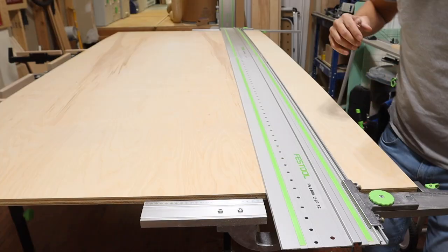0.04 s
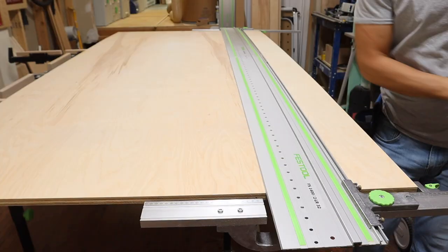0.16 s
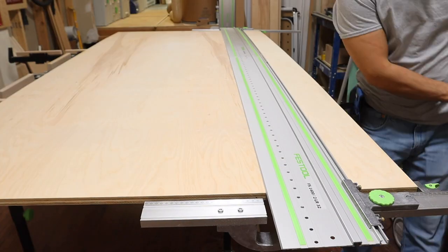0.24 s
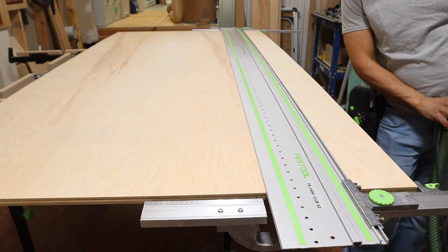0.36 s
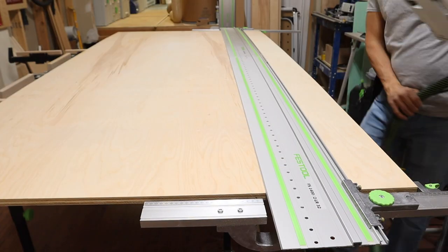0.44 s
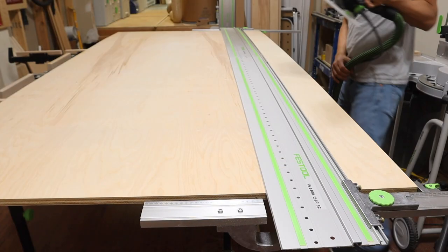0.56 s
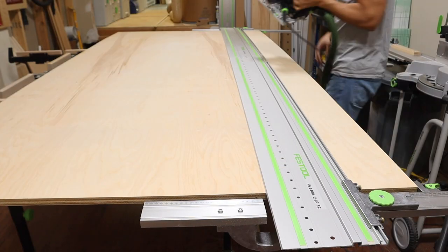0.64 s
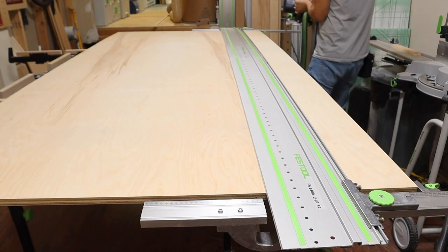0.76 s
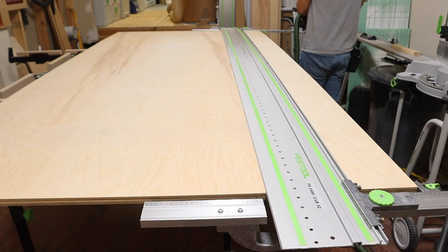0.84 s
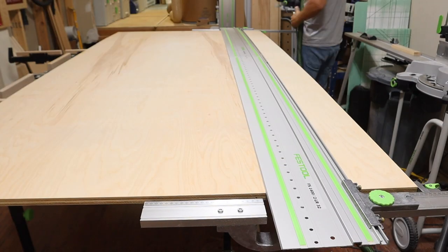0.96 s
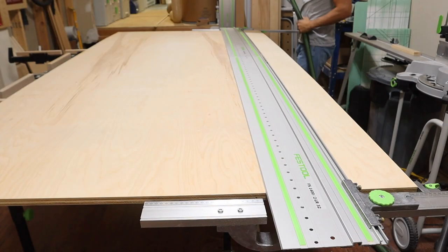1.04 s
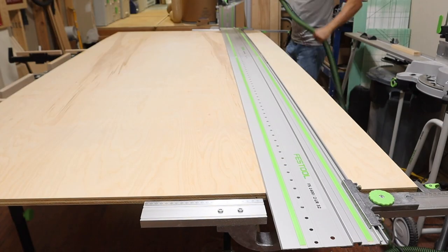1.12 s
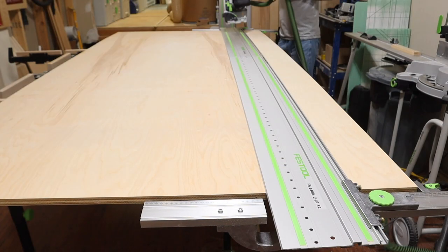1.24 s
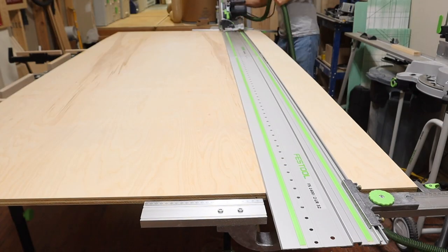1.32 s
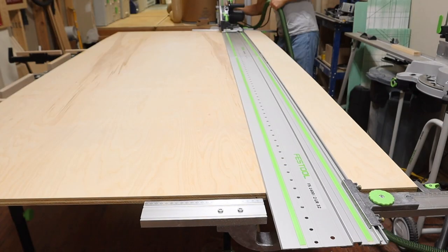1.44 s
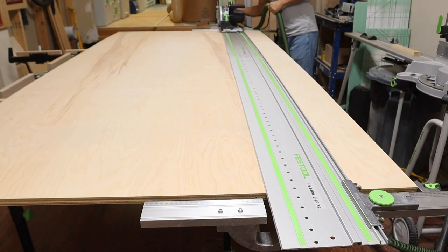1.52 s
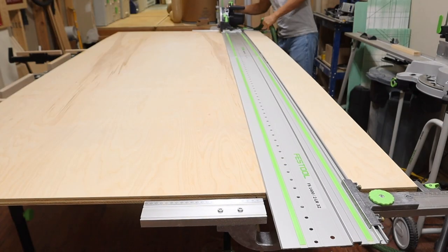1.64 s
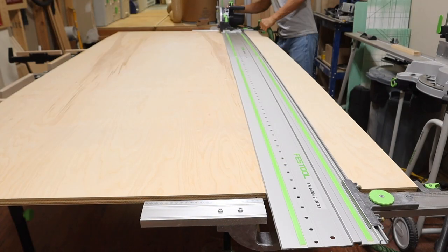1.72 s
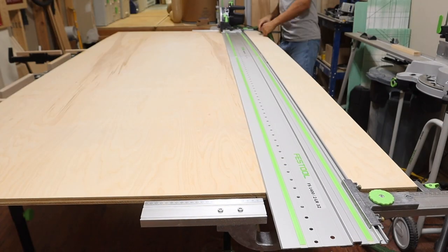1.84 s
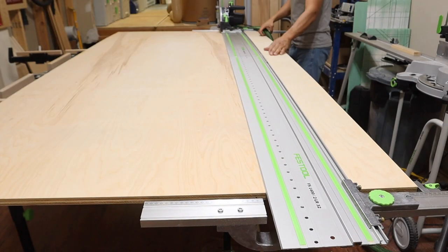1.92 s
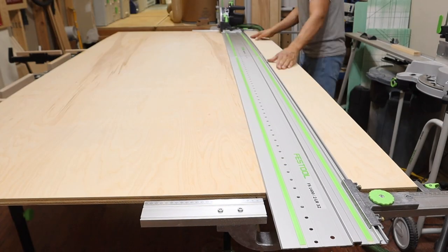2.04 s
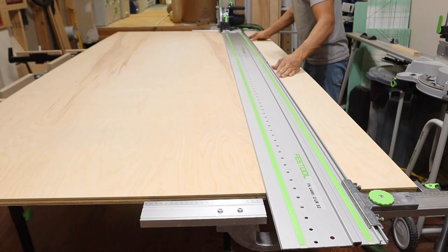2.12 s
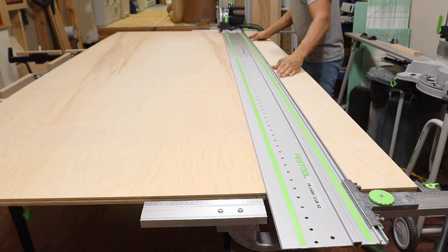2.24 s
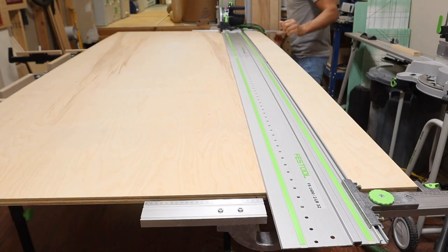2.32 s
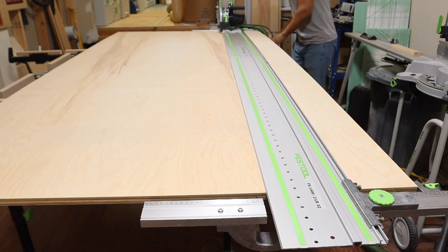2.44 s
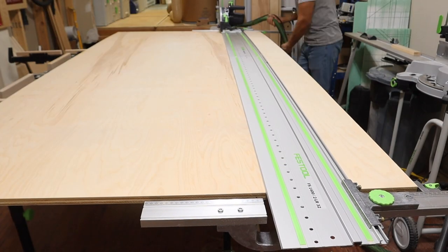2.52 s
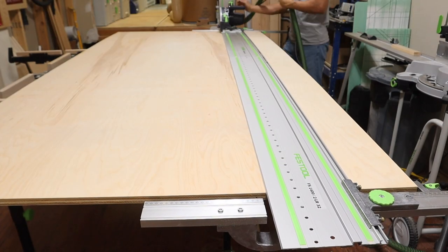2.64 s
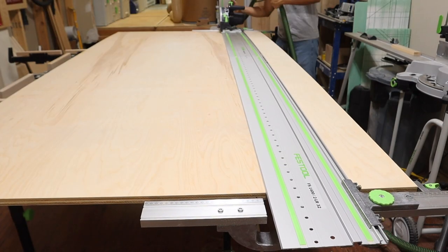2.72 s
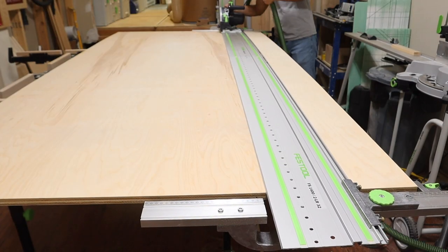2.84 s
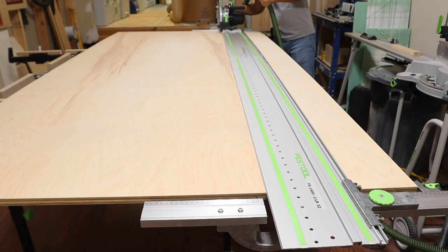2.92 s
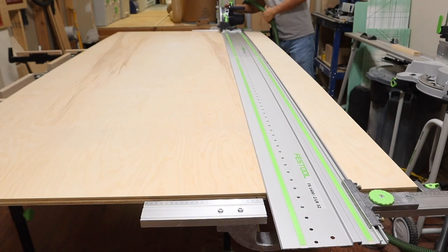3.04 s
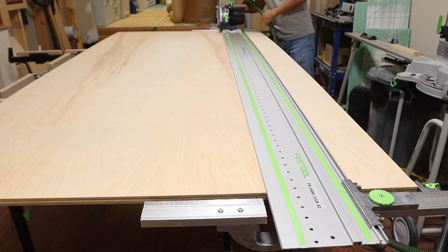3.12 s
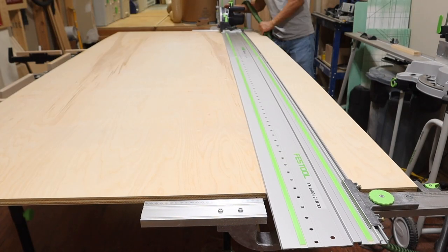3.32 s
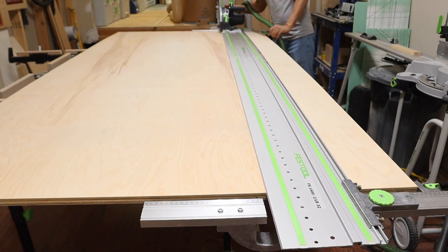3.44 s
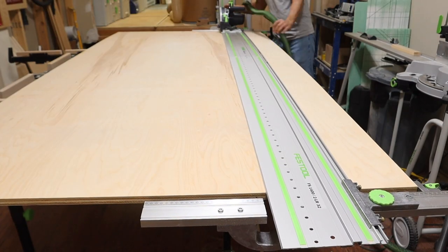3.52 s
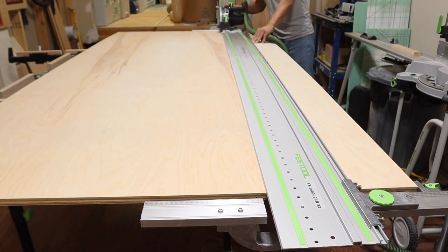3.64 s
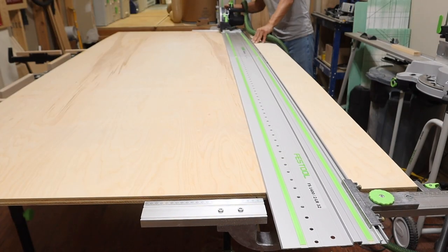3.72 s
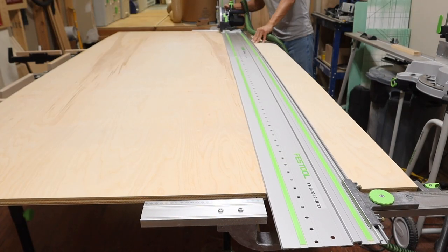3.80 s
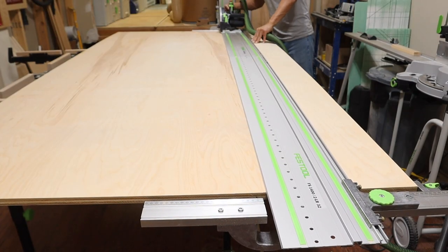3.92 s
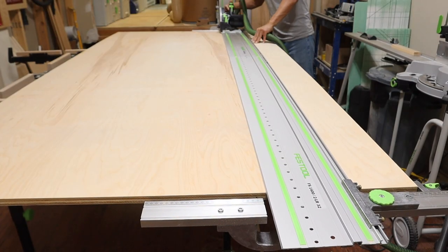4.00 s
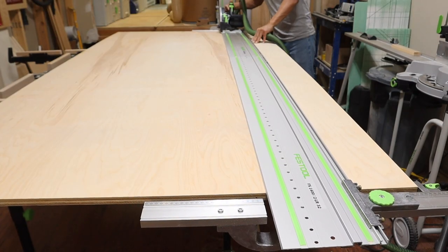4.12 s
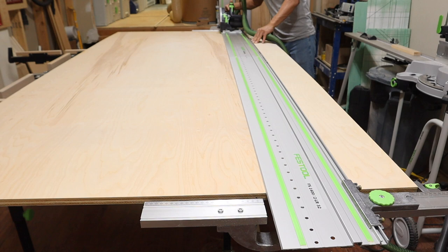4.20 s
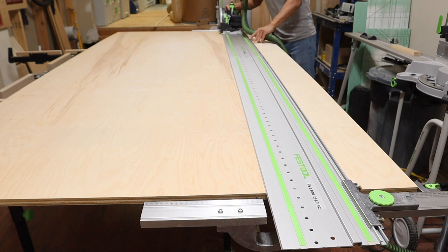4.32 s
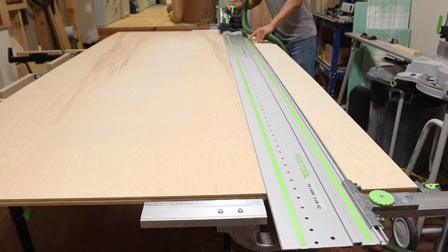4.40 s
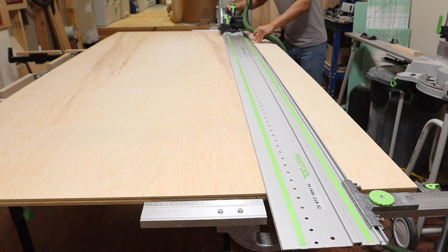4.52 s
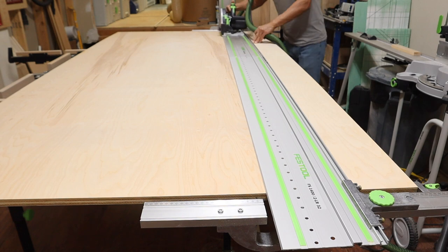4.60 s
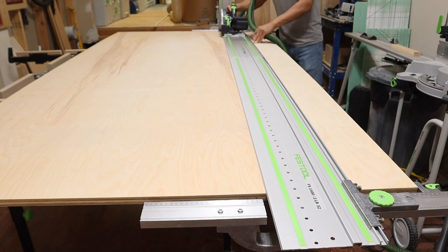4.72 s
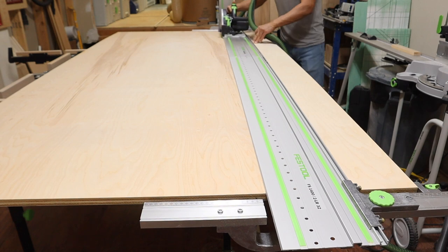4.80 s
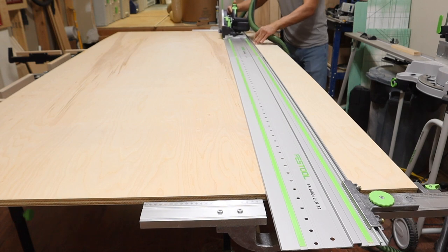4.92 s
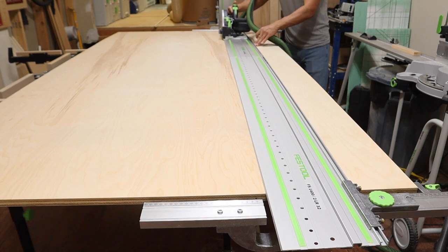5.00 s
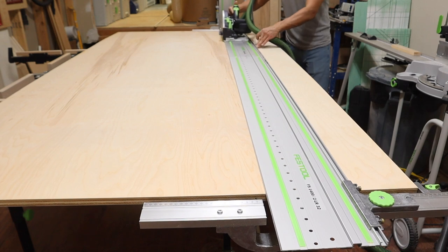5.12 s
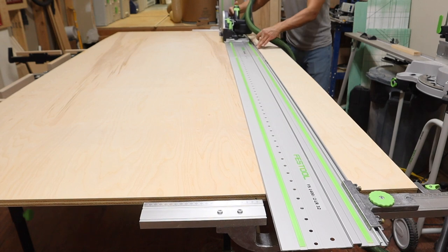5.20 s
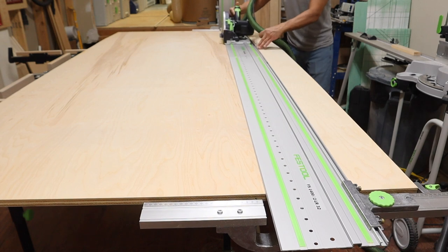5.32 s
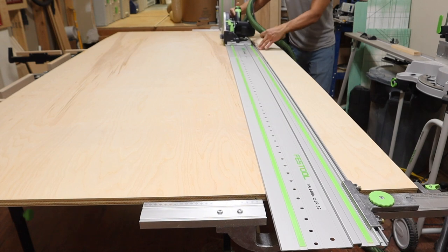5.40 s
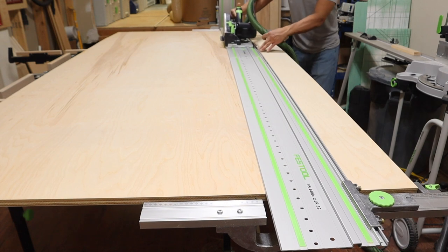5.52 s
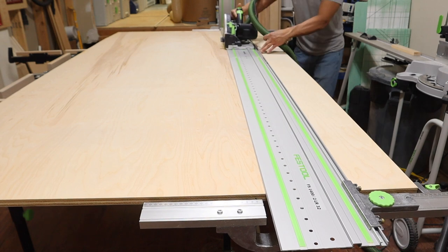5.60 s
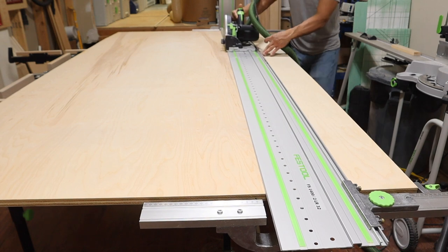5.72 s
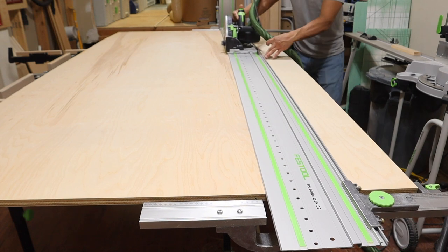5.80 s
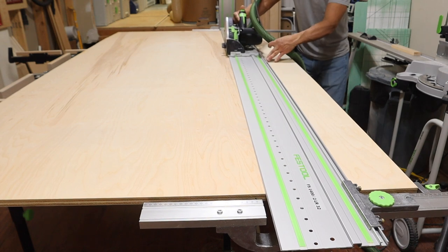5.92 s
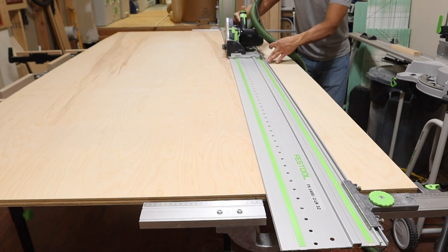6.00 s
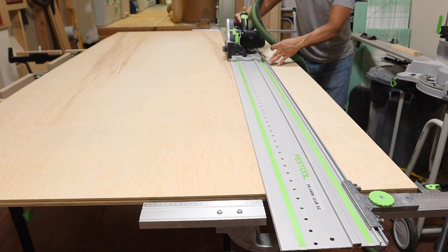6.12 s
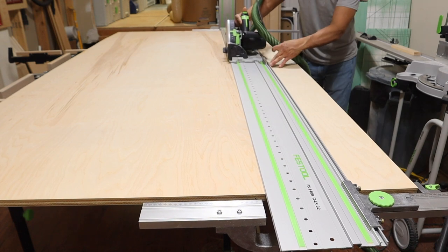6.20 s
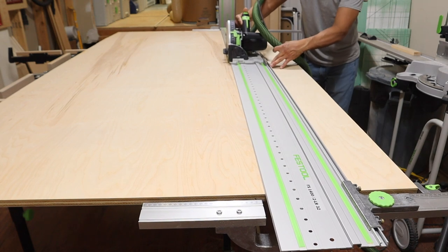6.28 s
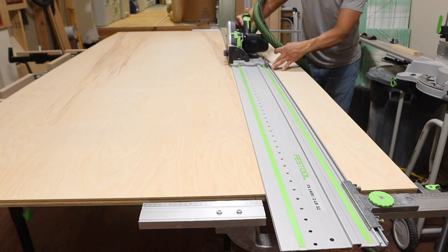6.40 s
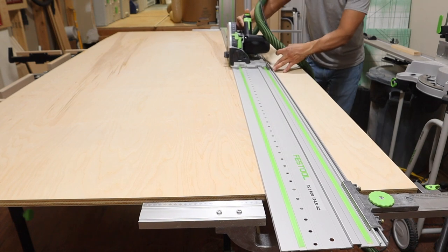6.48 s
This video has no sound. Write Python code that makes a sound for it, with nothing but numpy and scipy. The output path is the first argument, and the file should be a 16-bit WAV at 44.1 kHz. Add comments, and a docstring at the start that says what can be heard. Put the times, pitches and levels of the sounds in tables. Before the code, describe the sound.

A small workshop with faint tonal hum and soft hiss, heard centred with a short dry room tail. From 0 to 1.2 s a ribbed hose rustles and a saw base makes light taps and scrapes, with a sharper knock at 0.3 s. At 1.2 s comes a tiny high squeak, then clicks from 1.35 s and the loudest clunk at 1.65 s as the saw seats on the rail. Scuffs and a knock follow around 2.0 s, then sparse small taps at 2.45, 2.7 and 3.05 s. At 3.13 s the motor jolts on with a bright, harsh burst, its whine racing upward until 3.4 s. Blade rasp, gear and fan whines and rushing air fill 3.2-4.5 s, with slight dips near 4.0 and 4.2 s and faint low puffs. It then runs steadier, its shrill tones wavering, until rasping load returns at 6.27 s and continues nearly to the 6.5 s end.

```python
"""Plunge saw on a guide rail

A plunge track saw is set on its rail on a plywood sheet in a small, humming workshop.
The hose rustles and the base squeaks, knocks and scuffs: shaped noise and a gliding whistle.
Then the motor bursts into life: harmonic whines of fan, gears and drone follow pitch curves,
while noise through resonances gives the rushing air and the blade as it is pushed into the sheet.
"""
import sys
import numpy as np
from scipy import signal
from scipy.fft import rfft, irfft
from scipy.io import wavfile

SR = 44100
rng = np.random.default_rng(int(sys.argv[2]) if len(sys.argv) > 2 else 0)


def materialize(psi):
    """Save the field psi as 16-bit PCM at rate SR to the path in sys.argv[1].

    A 1-D psi becomes a single channel; in a 2-D psi each row is a channel.
    """
    bounded = np.clip(np.atleast_2d(psi).T, -1, 1)
    quanta = np.round(bounded * 32767).astype(np.int16)
    wavfile.write(sys.argv[1], SR, quanta)


N = 288855
TIME = np.arange(N) / SR
START_S = 3.128  # the motor is switched on


def from_db(db):
    """Logarithmic level: decibels to amplitude gain."""
    return 10 ** (np.asarray(db) / 20)


def rms_one(x):
    """Normalisation: scale to unit mean power."""
    return x / np.sqrt(np.mean(x ** 2) + 1e-20)


def in_time(rows):
    """Linear interpolation: each column of a curve at every sample."""
    seconds, *columns = np.transpose(rows)
    return [np.interp(TIME, seconds, column) for column in columns]


def noise(spectrum, resonances=(), size=N):
    """Spectral shaping: white noise given a broad colour and narrow resonances; rms 1."""
    hz = np.fft.rfftfreq(size, 1 / SR) + 1e-3
    points = np.array(spectrum)
    db = np.interp(np.log(hz), np.log(points[:, 0]), points[:, 1])
    for centre, width, lift in resonances:
        db = db + lift / (1 + (2 * (hz - centre) / width) ** 2)
    white = rng.standard_normal(size)
    return rms_one(irfft(rfft(white) * from_db(db), size))


def drift(rate):
    """Low-passed chance: a random curve changing about rate times a second; spread 1."""
    step = 20  # samples between the points of the slow curve
    settle = 4000  # points dropped while the filter settles
    pole = np.exp(-2 * np.pi * step * rate / SR)
    white = rng.standard_normal(N // step + settle + 2)
    slow = signal.lfilter([1], [1, -2 * pole, pole * pole], white)[settle:]
    return np.interp(np.arange(N) / step, np.arange(len(slow)), rms_one(slow))


def tone(pitch, orders, jitter, flutter_db, flutter_rate=12):
    """Fourier series: harmonics of a slightly unsteady pitch, each fluttering in level."""
    phase = 2 * np.pi * np.cumsum(pitch * (1 + jitter * drift(35.0))) / SR
    total = 0
    for multiple, db in orders:
        gain = from_db(db + flutter_db * drift(flutter_rate))
        total = total + gain * np.sin(round(multiple) * phase + rng.uniform(0, 2 * np.pi))
    return np.sqrt(2) * total  # a sine of rms 1 peaks at sqrt(2)


def swell(start, end, rise_s, fall_s):
    """Exponential release: rise from start, hold until end, then die away; top 1."""
    rise = np.clip((TIME - start) / rise_s, 0, 1)
    return rise * np.exp(-np.clip((TIME - end) / fall_s, 0, 20))


SURGE_DB, SURGE_RISE_S = -26, 0.034


def surge(hold_s=0.073, fall_db_per_s=84):
    """Starting transient: the jolt builds fast, holds and dies as the blade gains speed; top 1."""
    age = TIME - START_S
    rise = np.clip(age / SURGE_RISE_S, 0, 1) ** 2
    return rise * from_db(-fall_db_per_s * np.maximum(age - hold_s, 0))


# Spells in which blade and gears are worked hard.
# Each row: start in seconds, end in seconds, level at the start in dB, easing in dB per second.
LOAD_SPELLS = [(3.2, 3.98, -36, 4), (4.03, 4.169, -35, 14), (4.202, 4.526, -35, 2), (6.27, 6.523, -36, 0.5)]


def effort(idle_db=-46.5, rise_s=.025, fall_s=.018):
    """Addition of powers: idling, the starting jolt and the spells of load make one gain."""
    idle = from_db(idle_db) * np.clip((TIME - START_S) / SURGE_RISE_S, 0, 1)
    parts = [idle, from_db(SURGE_DB) * surge()]
    for start, end, db, easing in LOAD_SPELLS:
        eased = from_db(db - easing * np.maximum(TIME - start, 0))
        parts.append(eased * swell(start, end, rise_s, fall_s))
    return np.linalg.norm(parts, axis=0)


# Broad colour of the cutting noise. Each row: frequency in Hz, relative density in dB per Hz.
RASP_COLOUR = [(180, -80), (300, -58), (372, -52), (590, -21.5), (620, -18), (1090, -14.5), (1280, -14),
               (1750, -14.5), (2140, -13.5), (4210, -6), (7500, 1), (8560, -5.5), (15500, -15.5)]
# Resonances of the blade. Each row: centre in Hz, width in Hz, lift in dB.
BLADE_MODES = [(664, 67, 6), (800, 50, 9.5), (1285, 97, 11.5), (1740, 180, -1), (2134, 130, 11),
               (3530, 170, 12), (4840, 44, 10), (5050, 23, 9.5), (5300, 30, 10), (5700, 33, 4),
               (5930, 34, 8), (6730, 40, 7.5), (6700, 42, -4), (7340, 62, 0), (7220, 35, 8),
               (7650, 60, 10.5), (7900, 53, 13)]


def blade(load, rasp_db=-1, chatter_db=0.74, grit_db=1.0):
    """Forced vibration: uneven tooth and gear contacts set the steel disc ringing."""
    roughness = chatter_db * drift(31) + grit_db * drift(430)
    return load * from_db(rasp_db + roughness) * noise(RASP_COLOUR, BLADE_MODES)


# Gear whine, sagging and surging. Each row: time in seconds, pitch in Hz.
GEAR_PITCH = [(3.3, 2120), (3.43, 2266), (3.82, 2245), (3.95, 2156), (4.04, 2202), (4.1, 2344),
              (4.27, 2225), (4.55, 2243), (4.88, 2252), (5.1, 2211), (5.33, 2260), (5.55, 2210),
              (5.8, 2255), (5.93, 2210), (6.1, 2284), (6.25, 2267), (6.55, 2264)]
# Harmonics of the gear whine. Each row: multiple of the pitch, level in dB before the slow fade.
GEAR_ORDERS = [(1, -52.5), (2, -53), (4, -52), (5, -54.5), (6, -65)]
# The rotor's own hum. Each row: time in seconds, level in dB.
ROTOR_LEVEL = [(3.3, -84), (4.15, -74.5), (5.1, -87), (6.1, -72.5), (6.55, -73)]


def gears(rise_s=0.049, fade_db_per_s=1.5, rotor_ratio=.2058):
    """Meshing frequency: gears and rotor share one speed; the whine enters and slowly recedes."""
    (pitch,), (rotor_db,) = in_time(GEAR_PITCH), in_time(ROTOR_LEVEL)
    age = TIME - GEAR_PITCH[0][0]
    whine = tone(pitch, GEAR_ORDERS, jitter=0.00092, flutter_db=2.0, flutter_rate=9.5)
    whine *= from_db(-fade_db_per_s * age)
    # rotor_ratio: rotor turns per cycle of the gear whine
    rotor = from_db(rotor_db) * tone(pitch * rotor_ratio, [(1, 0)], jitter=0.0015, flutter_db=1.2)
    return np.clip(age / rise_s, 0, 1) * (whine + rotor)


# Pitch of the fan whine. Each row: time in seconds, pitch in Hz.
FAN_PITCH = [(3.1, 1150), (3.3, 1579), (3.4, 1705), (3.5, 1732), (3.89, 1738), (4.03, 1703), (4.22, 1739),
             (4.33, 1722), (4.58, 1717), (5.2, 1716), (5.9, 1712), (6.55, 1719)]
# Lower harmonics of the fan. Each row: multiple of the pitch, level in dB at the final speed.
FAN_LOW_ORDERS = [(1, -50), (2, -48.5)]
# The piercing third harmonic. Each row: time in seconds, level in dB at the final speed.
FAN_SHRILL = [(3.33, -62), (3.48, -39.5), (3.82, -50), (3.93, -42.5), (4.35, -42), (4.62, -46), (5.12, -43),
              (5.55, -48.5), (6.15, -49), (6.42, -42.5)]


def fan(rise_s=.2, speed_power=4):
    """Aeroacoustic power law: whine grows steeply with speed; its third harmonic swells and fades."""
    (pitch,), (shrill_db,) = in_time(FAN_PITCH), in_time(FAN_SHRILL)
    whine = tone(pitch, FAN_LOW_ORDERS, jitter=0.00044, flutter_db=0.77, flutter_rate=7.8)
    shrill = tone(pitch, [(3, 0)], jitter=0.0004, flutter_db=0.85, flutter_rate=16)
    whine += from_db(shrill_db) * shrill
    speed_gain = (pitch / pitch[-1]) ** speed_power
    return np.clip((TIME - START_S) / rise_s, 0, 1) * speed_gain * whine


# Partials of the electric drone. Each row: multiple of the pitch, level in dB at the surge's
# nominal top before throbbing, exponent of the load, lag behind the load in seconds,
# throbs per second, throb depth in dB, time of one crest in seconds.
DRONE_PARTIALS = [(1, -51.5, 0.55, 0.0099, 1.494, 3.8, 4.383), (2, -47, 1.03, -0.011, 6.13, 3.5, 4.14),
                  (3, -62, .55, -0.0046, 1.7, 4, 4.45)]


def drone(load, pitch_hz=636):
    """Amplitude modulation: the electric drone throbs and swells with load, the octave most."""
    out = 0
    for multiple, db, exponent, lag, rate, depth_db, crest in DRONE_PARTIALS:
        strain = np.interp(TIME - lag, TIME, load) / from_db(SURGE_DB)
        throb_db = depth_db * np.cos(2 * np.pi * rate * (TIME - crest))
        partial = tone(pitch_hz, [(multiple, 0)], jitter=0.0014, flutter_db=1.6)
        out = out + strain ** exponent * from_db(db + throb_db) * partial
    return out


# Resonances of blade and housing that sing out for a while.
# Each row: start in seconds, end in seconds, centre in Hz, width in Hz, held level in dB rms.
SINGING_MODES = [(3.15, 3.28, 7430, 100, -38), (3.15, 3.29, 7630, 63, -40), (3.4, 3.92, 2078, 36, -51.5),
                 (4.17, 5.177, 1163, 58, -59.5), (4.35, 5.4, 3485, 25, -50.5), (5.35, 5.65, 8870, 120, -51)]


def rings(rise_s=.03, fall_s=.05):
    """Resonance: narrow bands, driven by the rough contact, build up, hold and die away."""
    out, white = 0, rng.standard_normal(N)
    for start, end, hz, width, db in SINGING_MODES:
        edges = [hz - width / 2, hz + width / 2]
        band = signal.butter(2, edges, "band", fs=SR, output="sos")
        ringing = rms_one(signal.sosfilt(band, white))
        out = out + from_db(db) * ringing * swell(start, end, rise_s, fall_s)
    return out


# Strength of the rushing air. Each row: time in seconds, level in dB.
AIR_LEVEL = [(3.3, -33), (3.6, -35.5), (4.1, -34.5), (4.6, -36.5), (5.2, -34.5), (6.55, -35)]
# Broad colour of the air. Each row: frequency in Hz, relative density in dB per Hz.
AIR_COLOUR = [(25, -38), (60, -34), (130, -34.5), (300, -30.5), (540, -25.5), (700, -19.5), (950, -18.5),
              (1200, -15.5), (1600, -10), (1950, -10.5), (3400, -2), (5200, -3), (9000, -5), (15500, -3.5)]
# Resonances of the housing. Each row: centre in Hz, width in Hz, lift in dB.
HOUSING_MODES = [(696, 67, 9), (974, 480, -8.5), (1167, 120, 10), (1550, 330, -5), (1847, 69, 4.5),
                 (2270, 74, 7.5), (2320, 64, -5.5), (2410, 65, -0.5), (2760, 150, -1.5), (2900, 63, 4),
                 (3470, 86, 0), (4840, 160, -0.5), (5450, 930, -4.5), (6380, 88, 6.5), (6850, 60, 3.5),
                 (7950, 170, 0.5), (8730, 1200, 4), (10380, 170, 5), (12400, 90, 1)]


def air(rise_s=0.16, gust_db=0.5):
    """Turbulence: cooling and extraction air builds up and rushes through the resonant housing."""
    db, = in_time(AIR_LEVEL)
    flow = np.clip((TIME - START_S) / rise_s, 0, 1) * from_db(db + gust_db * drift(21))
    return flow * noise(AIR_COLOUR, HOUSING_MODES)


def reflections(x, count=8, strength=.18):
    """Comb filtering: echoes off sheet and walls, their paths creeping as the saw advances."""
    out = x.copy()
    # delay in seconds, creep in seconds of delay per second
    for delay, creep in rng.uniform([.001, -8e-5], [.014, 8e-5], (count, 2)):
        out += strength * np.interp(TIME - delay - creep * TIME, TIME, x)
    return out


# Puffs of air on the microphone. Each row: centre in seconds, level in dB, length (sigma) in seconds.
AIR_PUFFS = [(3.625, -52.5, .02), (3.681, -50, 0.0074), (3.715, -52, 0.017), (3.772, -59, 0.015),
             (3.818, -52, 0.013), (3.986, -61, 0.025), (4.025, -46, 0.0064), (4.06, -66, 0.021)]
# Colour of their rumble. Each row: frequency in Hz, relative density in dB per Hz.
PUFF_RUMBLE = [(25, -31), (60, -13), (130, 2.5), (250, -5), (400, -8.5), (600, -22), (1500, -70)]


def puffs():
    """Pseudo-sound: eddies of air brush the microphone as bell-shaped bursts of rumble."""
    gusts = 0
    for centre, db, length in AIR_PUFFS:
        gusts = gusts + from_db(db) * np.exp(-.5 * ((TIME - centre) / length) ** 2)
    return gusts * noise(PUFF_RUMBLE)


# Broad colour of a contact with rail or sheet. Each row: frequency in Hz, relative density in dB per Hz.
CONTACT_COLOUR = [(100, -55), (250, -13), (420, -15.5), (650, -9), (950, -7), (1200, 0), (1700, -1),
                  (2200, -2.5), (3000, -5), (3800, -4.5), (5000, -5), (7000, -5), (11000, -6.5),
                  (15500, -8)]
# What rail and sheet ring with. Each row: centre in Hz, width in Hz, lift in dB.
RAIL_MODES = [(640, 230, 10), (1200, 220, 8), (1570, 100, -2), (2274, 130, 7), (2980, 320, 4.5),
              (3440, 280, 2.5), (3860, 120, 3), (5840, 270, -1)]


def contact(bass, treble, size, count=12):
    """Contact stiffness: soft contacts favour bass, hard ones treble; each spot has its own modes."""
    hz, colour = np.transpose(CONTACT_COLOUR)
    tilt = np.interp(np.log(hz), np.log([1100, 3300, 9000]), [bass, 0, treble])
    # chance modes: centre Hz, width Hz, lift dB
    modes = rng.uniform([2000, 60, 2], [12000, 180, 6], (count, 3))
    return noise(np.c_[hz, colour + tilt], [*RAIL_MODES, *modes], size=size)


# Knocks of the saw and hose on rail and sheet. Each row: start in seconds, then level, bass tilt
# and treble tilt in dB, each relative to the offset of the same name in knocks().
CONTACT_KNOCKS = [(0.03, -58.5, -22, -41), (0.125, -49.5, -25, 6), (0.21, -48, -32, -20),
                  (0.31, -31, -13.5, 0), (0.345, -46.5, -19, -21), (0.392, -43, -10.5, -16),
                  (0.423, -48, -27, -22), (0.632, -49.5, -40, -25), (0.677, -48.5, -26, -34),
                  (0.782, -51.5, -9, -10), (0.869, -54.5, -28, -26), (1.001, -52, -10, -5),
                  (1.345, -48.5, -27, -23), (1.423, -38, -15.5, -8), (1.497, -43, -15, -11.5),
                  (1.554, -42, -10.5, -7.5), (1.571, -45.5, -14, -8), (1.643, -21, -10.5, -10),
                  (1.725, -37.5, -15, -9.5), (2.003, -38, -11.5, -17), (2.113, -47.5, -17, -46),
                  (2.453, -48, -15, -14.5), (2.707, -49, -7.5, -15.5), (3.022, -48.5, -37, -37),
                  (3.064, -48.5, -43, -2)]


def knocks(gain_db=-7, bass_db=8, treble_db=6, rise_s=0.0018, crack_s=0.0066,
           tail_db=-4, tail_t60=0.13, low_hz=220):
    """Impulse response: a short crack and a diffuse tail; light parts radiate no deep bass."""
    out, t = np.zeros(N + SR), TIME[:SR // 4]
    crack = np.exp(-t / crack_s)
    tail = from_db(tail_db - 60 * t / tail_t60)
    shape = (crack + tail) * np.minimum(t / rise_s, 1)
    for start, db, bass, treble in CONTACT_KNOCKS:
        at = int(start * SR)
        hit = contact(bass + bass_db, treble + treble_db, len(t)) * shape
        out[at:at + len(t)] += from_db(db + gain_db) * hit
    return signal.sosfilt(signal.butter(2, low_hz, "high", fs=SR, output="sos"), out[:N])


# Scuffs of the base and hands on the sheet. Each row: centre in seconds, level in dB,
# length (sigma) in seconds, bass tilt in dB, treble tilt in dB.
SHEET_SCUFFS = [(0.176, -56, 0.0072, -23, 0), (0.327, -56, 0.015, 2, 6), (1.641, -51.5, 0.0044, -15, 2),
                (1.737, -47.5, 0.0076, 4, -5), (1.85, -60, 0.01, -1, 7), (1.942, -61, 0.015, 5, 1),
                (2.001, -46.5, .012, 3.5, 4.5), (2.036, -55, 0.018, -2, -4), (2.083, -54, 0.011, -1, -9),
                (2.337, -71, 0.009, -12, 10), (2.396, -67, 0.012, -6, -14), (2.521, -64, 0.013, -4.5, 2)]


def scuffs(grain_db=1.5):
    """Sliding friction: short slides swell and fade with no hard attack."""
    out, t = np.zeros(N + SR), TIME[:SR // 4]
    middle = t.mean()
    for centre, db, length, bass, treble in SHEET_SCUFFS:
        at = max(int((centre - middle) * SR), 0)
        bell = np.exp(-.5 * ((t - middle) / length) ** 2)
        out[at:at + len(t)] += from_db(db) * contact(bass, treble, len(t)) * bell
    return out[:N] * from_db(grain_db * drift(200))


def strokes(rows, fall_s, rise_s=0.02):
    """Superposition: strokes of rubbing share one rise and fade."""
    return sum(from_db(db) * swell(start, end, rise_s, fall_s) for start, end, db in rows)


# The hose brushes over clothes and sheet. Each row: start in seconds, end in seconds, level in dB.
HOSE_STROKES = [(.13, .23, -66.5), (.32, .41, -66), (.51, .6, -68), (.6, .72, -64), (.85, .95, -64.5),
                (1.0, 1.13, -65.5), (1.19, 1.33, -68), (2.59, 2.65, -76), (2.95, 2.98, -76)]
# The base slides. Each row: start in seconds, end in seconds, level in dB.
BASE_STROKES = [(.12, .22, -67), (.31, .39, -59), (.47, .56, -75), (.56, .66, -67), (.86, .97, -65.5),
                (1.0, 1.11, -68), (1.11, 1.17, -66), (1.26, 1.33, -73), (1.97, 2.16, -57),
                (2.36, 2.54, -77), (2.57, 2.82, -81)]
# Colour of the brushing hose. Each row: frequency in Hz, relative density in dB per Hz.
HOSE_COLOUR = [(400, -26.5), (1200, -13.5), (1900, -7.5), (2650, 1), (3300, -3.5), (4200, -8.5),
               (6000, -10.5), (15000, -26)]
# Colour of the sliding base. Each row: frequency in Hz, relative density in dB per Hz.
SLIDE_COLOUR = [(800, -20), (3000, -9.5), (6000, -1.5), (9000, 0.5), (15500, 2.5)]


def rubbing(stir_db=-82, stir_end_s=1.9, grain_db=2.0, rib_db=1.5):
    """Granular friction: ribbed hose and base catch and slip; both stir faintly while carried."""
    stir = from_db(stir_db) * (TIME < stir_end_s)
    hose_level = np.hypot(strokes(HOSE_STROKES, fall_s=0.04), stir)
    slide_level = np.hypot(strokes(BASE_STROKES, fall_s=0.027), stir)
    hose = hose_level * from_db(rib_db * drift(400)) * noise(HOSE_COLOUR)
    slide = slide_level * noise(SLIDE_COLOUR)
    return (hose + slide) * from_db(grain_db * drift(90))


def room(x, wet_db, t60_s=0.14):
    """Reverberation: dense, quickly dying reflections from cluttered walls."""
    t = TIME[:SR // 3]
    tail = rng.standard_normal(len(t)) * from_db(-60 * t / t60_s) * (t > .003)
    return x + from_db(wet_db) * signal.fftconvolve(x, tail / np.linalg.norm(tail))[:N]


# Harmonics of the squeak. Each row: multiple of the pitch, level in dB relative to the first.
SQUEAK_HARMONICS = [(1, 0), (2, -6), (3, -18.5)]


def squeak(start_s=1.21, end_s=1.257, rest_hz=4340, level_db=-36.5, sag=0.045, waver=0.018,
           rough_db=2.0, friction_db=-25):
    """Stick-slip: the base whistles on the rail, lower as it presses harder, over friction hiss."""
    pressure = swell(start_s, end_s, rise_s=0.019, fall_s=0.0075)
    pitch = rest_hz * (1 - sag * pressure + waver * drift(110))
    whistle = tone(pitch, SQUEAK_HARMONICS, jitter=.004, flutter_db=2.0)
    slip = whistle * from_db(rough_db * drift(200)) + from_db(friction_db) * noise(SLIDE_COLOUR)
    return room(from_db(level_db) * pressure * slip, wet_db=-13)


# Tones of the workshop's hum. Each row: frequency in Hz, level in dB rms before HUM_STRENGTH.
HUM_TONES = [(306.8, -74), (635.2, -80), (1270, -94), (1540, -89.5), (1906, -99), (2977, -94.5),
             (3580, -97)]
# Strength of the hum. Each row: time in seconds, gain in dB.
HUM_STRENGTH = [(3.1, -1), (3.4, -4.5), (6.55, -11)]
# Colour of the faint hiss. Each row: frequency in Hz, relative density in dB per Hz.
HISS_COLOUR = [(30, -28), (60, -23), (120, -9.5), (200, -1.5), (400, 0.5), (750, 1), (1300, -2.5),
               (3000, -6), (4500, -9), (15500, -20.5)]


def workshop(hiss_db=-76.5):
    """Background noise: pure machine tones, fainter once the saw starts, over steady faint hiss."""
    gain_db, = in_time(HUM_STRENGTH)
    hum = 0
    for hz, db in HUM_TONES:
        hum = hum + np.sqrt(2) * from_db(db) * np.sin(2 * np.pi * (hz * TIME + rng.random()))
    return from_db(gain_db) * hum + from_db(hiss_db) * noise(HISS_COLOUR)


def scene():
    """Superposition: all sources add at one microphone, which feeds both channels."""
    load = effort()
    saw = fan() + gears() + drone(load) + rings() + reflections(air() + blade(load))
    handling = knocks() + scuffs() + rubbing() + squeak()
    mono = saw + handling + puffs() + workshop()
    return np.array([mono, mono])


def record(dry, cutoff_hz=15850):
    """Band limiting: a long symmetric filter cuts the top steeply."""
    lowpass = signal.firwin(601, cutoff_hz, fs=SR)
    return signal.fftconvolve(dry, lowpass[None], mode="same", axes=1)


dry = scene()
out = record(dry)
materialize(out)
```